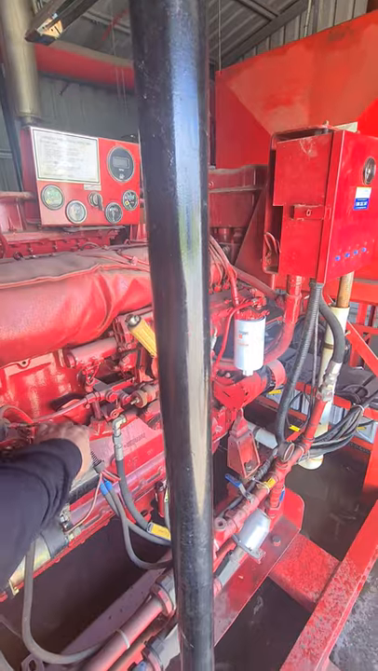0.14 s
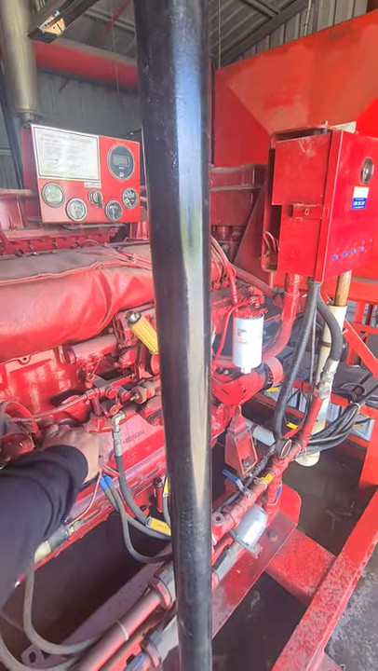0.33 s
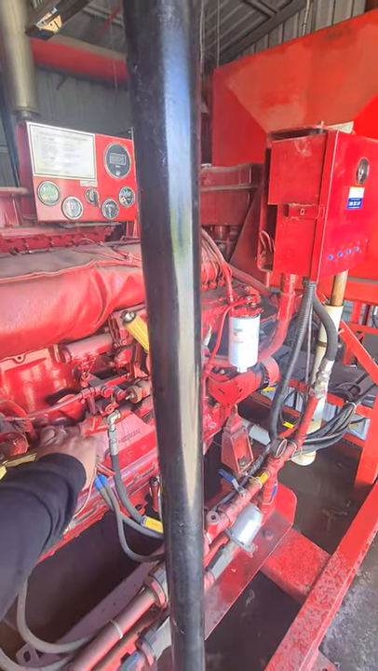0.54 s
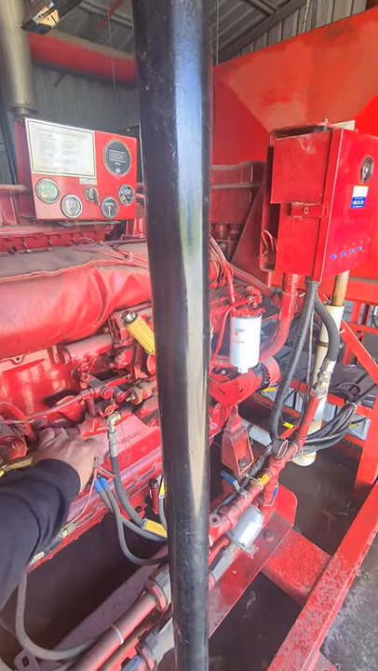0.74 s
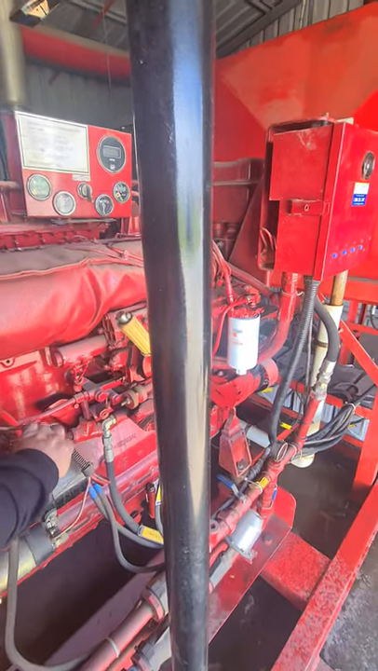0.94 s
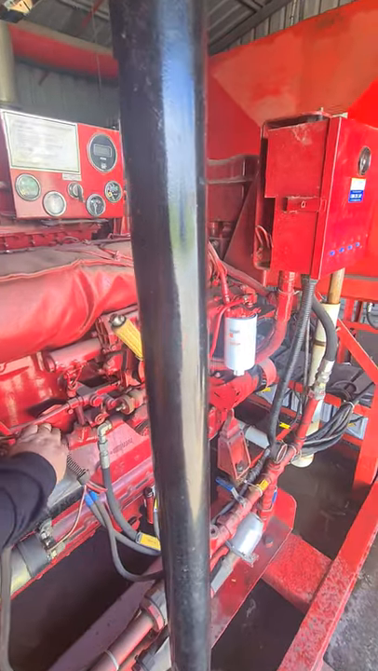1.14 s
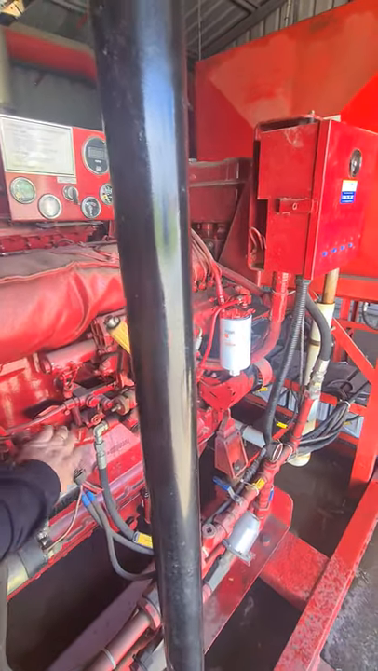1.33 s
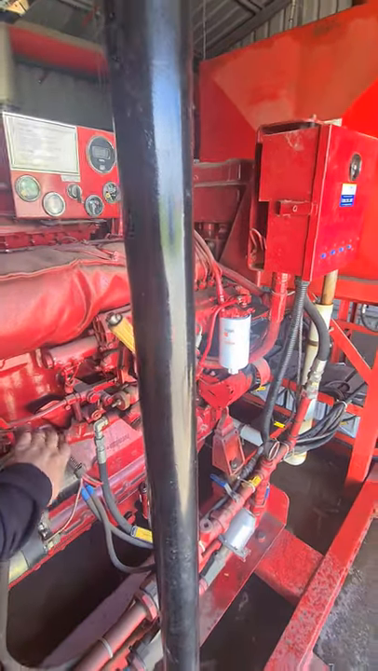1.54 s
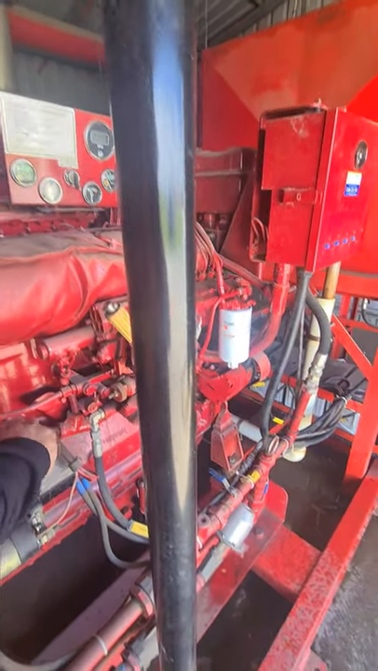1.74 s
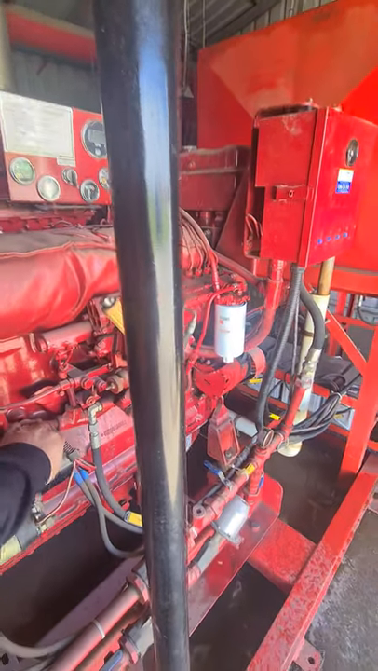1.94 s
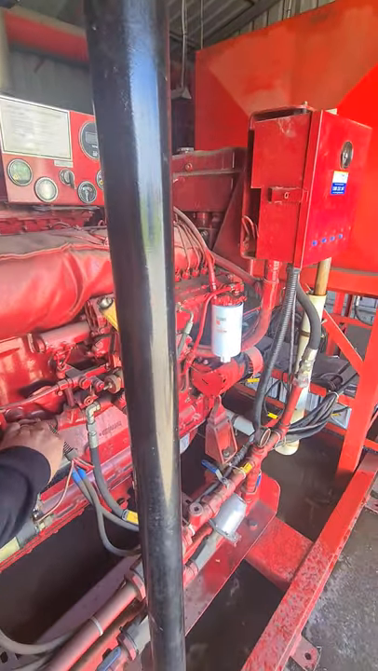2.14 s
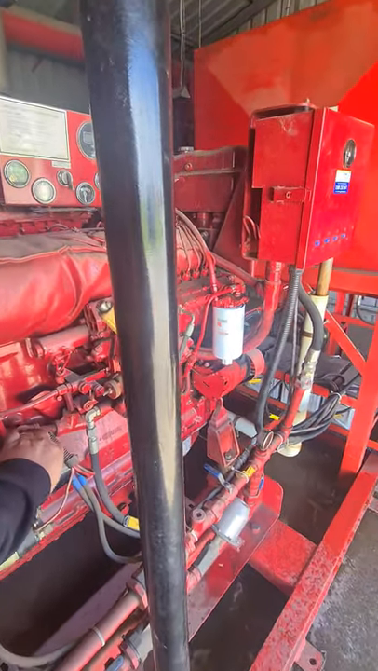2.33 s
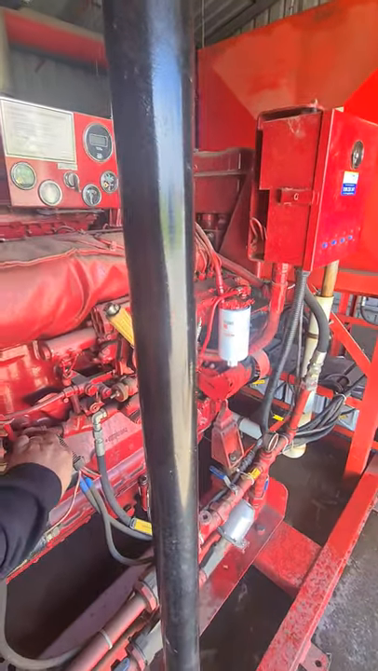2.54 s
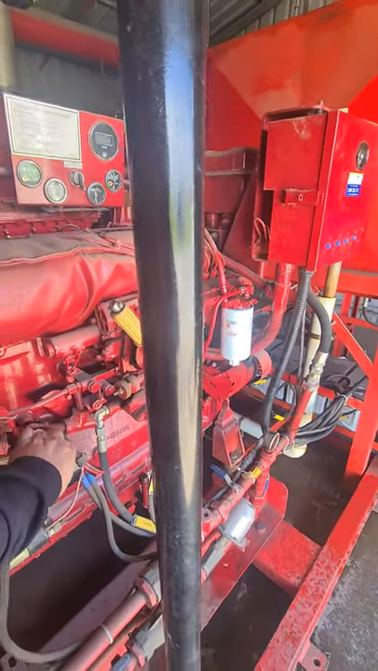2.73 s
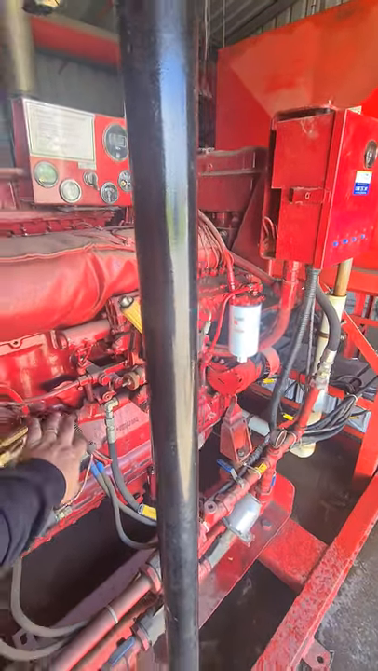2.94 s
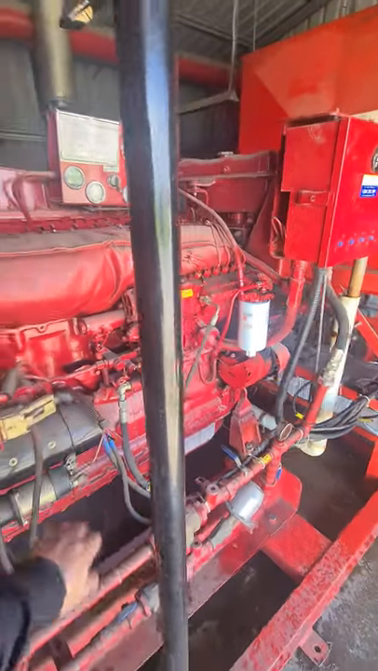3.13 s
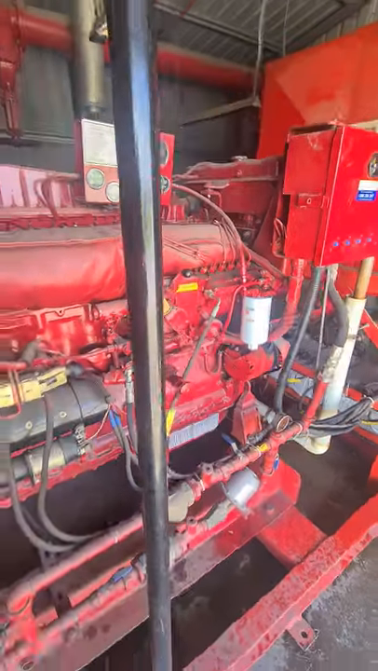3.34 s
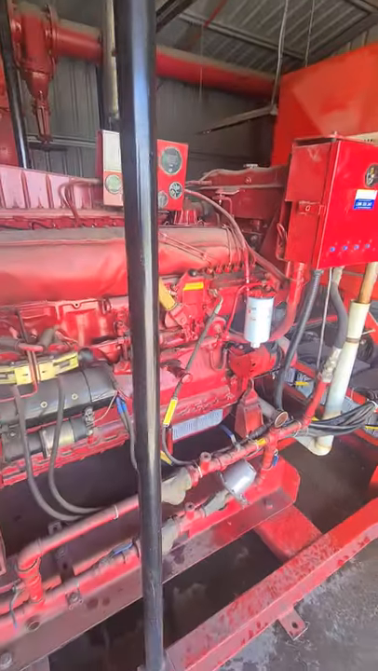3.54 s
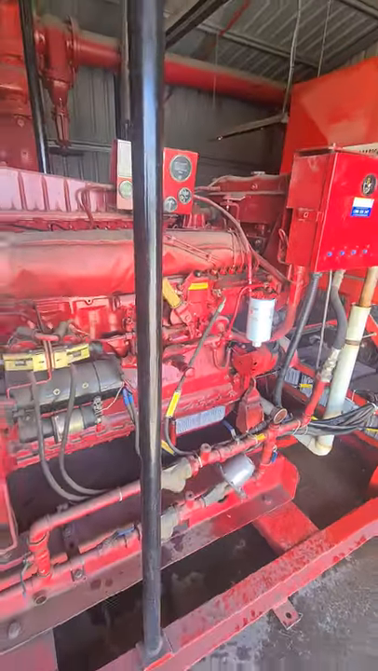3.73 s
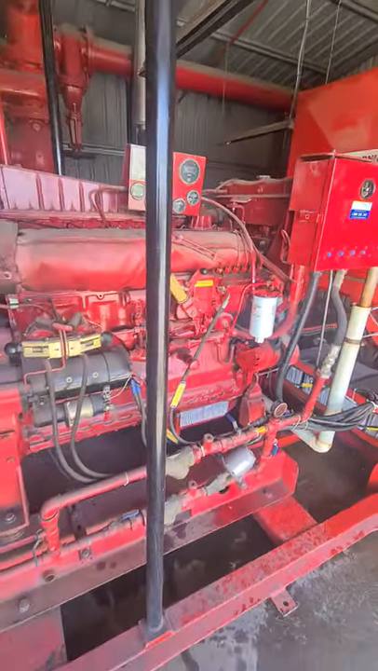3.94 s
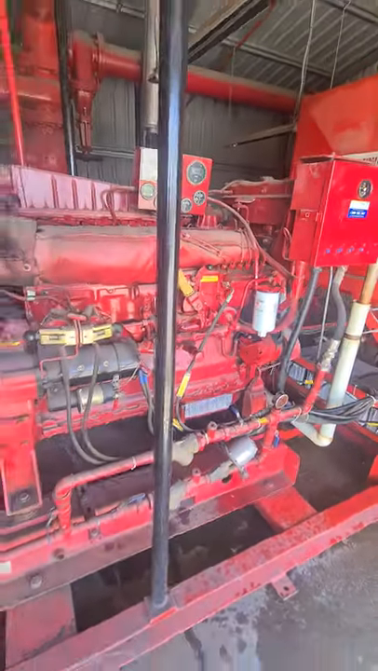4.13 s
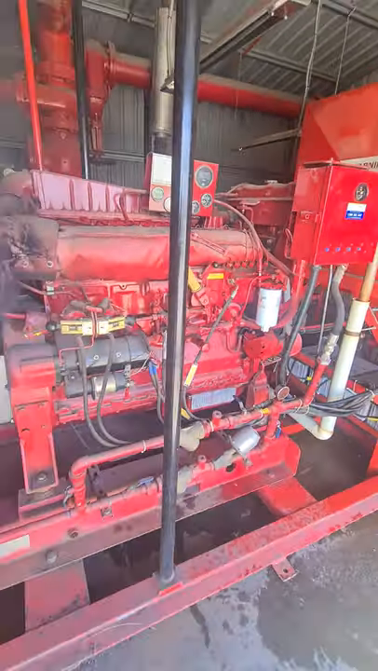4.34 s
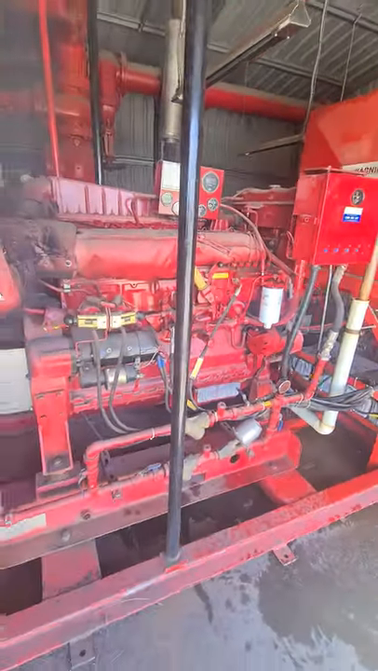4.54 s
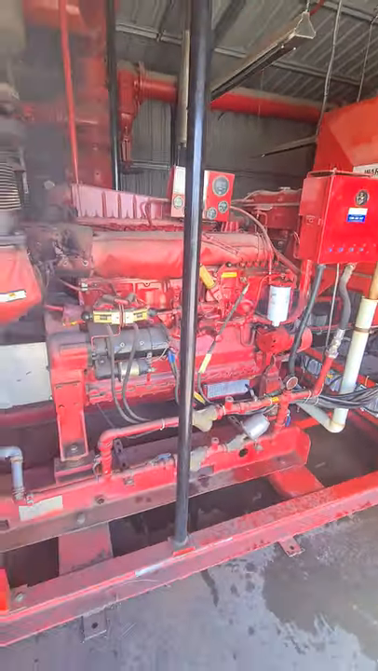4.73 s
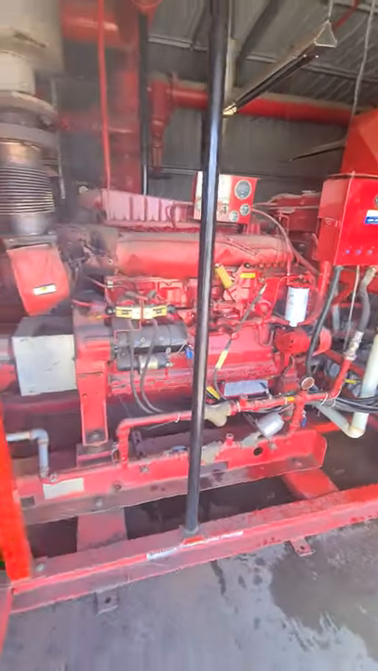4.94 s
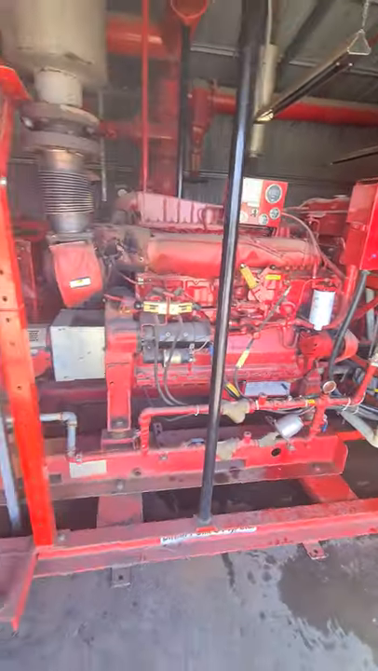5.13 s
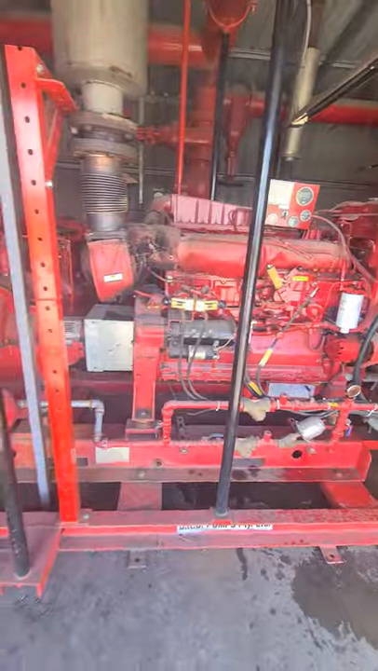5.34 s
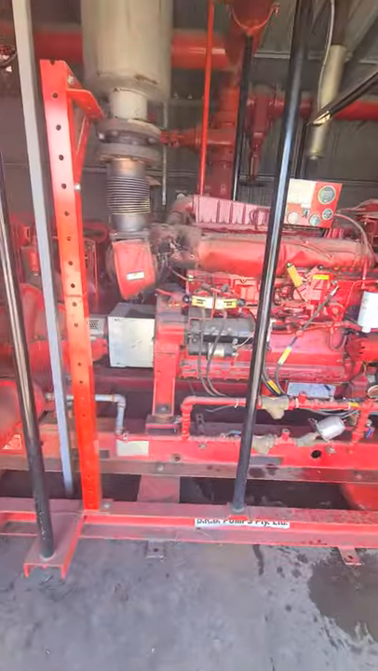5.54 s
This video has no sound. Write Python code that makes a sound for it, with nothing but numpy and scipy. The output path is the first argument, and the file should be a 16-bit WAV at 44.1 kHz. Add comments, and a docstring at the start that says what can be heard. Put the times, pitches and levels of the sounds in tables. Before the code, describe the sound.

A faint, throbbing machine hum fills a sheet-metal pump house. Small lever clicks come close by at about 0.3 seconds. At 1 second a starter contact snaps and the gear slams in with a heavy clank that rings the steel frame. Gears knock briefly, a lighter clunk follows at 1.3 seconds, and the engine rocks back to rest. Just after 2.1 seconds a sharper snap and a second slam start it cranking, with rasping teeth and a low boom. The big diesel catches at about 2.6 seconds and races up, its separate knocks and thuds merging under injector hiss and rising exhaust tones. One more sharp click sounds at 3 seconds, as the listener steps back and the hiss begins to dull. A thin, high belt squeal grows, then shoots up and vanishes around 4.3 seconds. The engine then runs loud and steady until 5.5 seconds.

```python
"""A sheet-metal pump house, where a big six-cylinder diesel is started by hand.
The starter contact snaps, the pinion slams in and rings the frame, and the engine rocks back to rest.
At the second try it cranks with knocking gear teeth, fires and runs up to governed speed: each firing
strikes the block, injectors hiss, exhaust tones sweep through the pipe and the belt squeals briefly.
The listener steps back, which dulls the hiss. Another machine hums far off."""
import sys
import numpy as np
from scipy import signal
from scipy.fft import rfft, irfft, next_fast_len
from scipy.io import wavfile
from scipy.ndimage import uniform_filter1d

SR = 44100
rng = np.random.default_rng(int(sys.argv[2]) if len(sys.argv) > 2 else 0)


def log_audio(samples):
    """Write samples as a 16-bit WAV file to the path given in sys.argv[1]."""
    # one column per channel
    frames = np.atleast_2d(samples).T
    # limit to full scale, then quantise
    limited = np.clip(frames, -1, 1)
    pcm = np.round(limited * 32767).astype(np.int16)
    wavfile.write(sys.argv[1], SR, pcm)


N = 250929
TIME = np.arange(N) / SR
CYLINDERS = 6


def from_db(db):
    return 10 ** (np.asarray(db) / 20)


def unit_rms(x):
    return x / np.sqrt(np.mean(x ** 2) + 1e-20)


def at_hz(table, hz):
    """A table read on a log-frequency axis."""
    table_hz, values = np.transpose(table)
    return np.interp(np.log(hz), np.log(table_hz), values)


def ramp(start_s, length_s):
    return np.clip((TIME - start_s) / length_s, 0, 1)


def envelope(start_s, attack_s, hold_s, fall_db_per_s):
    falling_s = np.maximum(TIME - start_s - attack_s - hold_s, 0)
    return ramp(start_s, attack_s) * from_db(-fall_db_per_s * falling_s)


def drift(rate_hz):
    """Random wander, rms 1."""
    knots = rng.standard_normal(int(N / SR * rate_hz) + 2)
    return unit_rms(np.interp(TIME * rate_hz, np.arange(len(knots)), knots))


def resonate(x, hz, width_hz):
    """Two-pole resonance, rms 1."""
    r = np.exp(-np.pi * width_hz / SR)
    poles = [1, -2 * r * np.cos(2 * np.pi * hz / SR), r * r]
    return unit_rms(signal.lfilter([1, 0, -1], poles, x + 1e-18))


def add(out, start_s, sound):
    i = round(start_s * SR)
    out[:, i:i + sound.shape[-1]] += sound[..., :N - i]


def steady(x):
    """Evens out slow level changes, leaving the single beats."""
    power = uniform_filter1d(np.mean(x ** 2, axis=0), size=8000)
    return x / np.sqrt(np.abs(power) + np.mean(x ** 2) / 20)


def pulses(strokes, rate_hz, decay_s, floor, uneven_db):
    """A rounded swell of uneven strength at each whole stroke count."""
    force = from_db(uneven_db * rng.uniform(-1, 1, 2000))[strokes.astype(int)]
    since_s = strokes % 1 / rate_hz
    return steady(uniform_filter1d(floor + force * np.exp(-since_s / decay_s), size=70)[None])


def struck(modes, rise_s):
    """One second of decaying modes, phased differently on each side."""
    t, out = TIME[:SR], 0
    for hz, db, t60 in modes:
        phase = rng.random() + min(hz / 3000, 1) * rng.random((2, 1))
        out = out + from_db(db - 60 * t / t60) * np.sin(2 * np.pi * (hz * t + phase))
    return out * (1 - np.exp(-t / rise_s))


# room width: (frequency [Hz], side re mid [dB])
ROOM_WIDTH = [(60, -27), (125, -11), (250, -20.5), (550, -2), (1100, 0), (15000, 0)]
# room balance: (frequency [Hz], left re right [dB])
ROOM_BALANCE = [(100, -1), (350, -4), (700, -1), (2400, -.5), (5000, 2.5), (7500, 7), (11000, -1.5)]


def room_noise(spectrum, count=N, tilt_db_per_oct=0, ripple_db=3.5):
    """Noise with a fine random ripple in its upper spectrum, giving a faintly ringing colour; rms 1."""
    size = next_fast_len(count, True)
    hz = np.maximum(np.fft.rfftfreq(size, 1 / SR), 1)
    mid, side = rfft(rng.standard_normal((2, size)))
    ripple = np.interp(hz, np.linspace(0, SR / 2, 400), rng.standard_normal(400))
    ripple *= np.minimum(hz / 1500, 1)
    width, sides = from_db(at_hz(ROOM_WIDTH, hz)), np.array([[1], [-1]])
    stereo = (mid + sides * width * side) / np.hypot(1, width)  # centred bass, diffuse above
    colour_db = at_hz(spectrum, hz) + ripple_db * ripple + tilt_db_per_oct * np.log2(hz)
    pan_db = sides * at_hz(ROOM_BALANCE, hz) / 2
    rolloff = np.minimum(spectrum[-1][0] / hz, 1) ** 4
    return unit_rms(irfft(from_db(colour_db + pan_db) * rolloff * stereo, size)[:, :count])


# room decay: (frequency [Hz], t60 [s])
ROOM_DECAY = [(100, 0.5), (500, 1.272), (2000, 1.0026), (6000, 0.6604), (13000, 0.0004)]


def blow(spectrum, t60_s, room_db, bloom_s, tilt_db_per_oct=0, count=32768):
    """A blow on metal: a noisy ring dies away, the room rings on, the lows build up last."""
    t, out = TIME[:count], 0
    noise_bins = rfft(room_noise(spectrum, count, tilt_db_per_oct))
    octave = np.log2(np.clip(np.fft.rfftfreq(count, 1 / SR), 128, 16384))
    for k in range(7, 15):
        band = irfft(noise_bins * np.maximum(1 - abs(octave - k), 0))
        rise = 1 - np.exp(-t / (bloom_s * (1000 / 2 ** k) ** 1.1502))
        metal = from_db(-60 * t / t60_s)
        room = from_db(room_db - 60 * t / at_hz(ROOM_DECAY, 2 ** k))
        out = out + band * rise * np.hypot(metal, room)
    return out


# room air spectrum: (frequency [Hz], density [dB])
AIR_SPECTRUM = [(20, -36.5), (48, -12.5), (72, -3), (123, -20.5), (215, -25), (270, -20), (310, -27.5),
                (900, -31), (3200, -42.5), (7000, -50), (9500, -61.5), (16000, -67)]


def background():
    """Air in the pump house and the throbbing hum of a distant machine."""
    hum = resonate(rng.standard_normal(N), hz=74.55, width_hz=11.5)
    hum = resonate(hum, hz=90.1, width_hz=22.14)
    return from_db(-35.5) * room_noise(AIR_SPECTRUM) + from_db(-50) * hum


# gas puffs: (time [s], attack [s], hold [s], level [dB])
GAS_PUFFS = [(1.03, 0.2931, 0.028, -25), (2.449, 0.1841, 0.3572, -21.5)]


def silencer():
    """Gas booms through the silencer while the pistons move slowly."""
    level = sum(from_db(db) * envelope(s, attack_s, hold_s, fall_db_per_s=23)
                for s, attack_s, hold_s, db in GAS_PUFFS)
    return level * room_noise([(22, -22.5), (45, -10), (80, -9), (140, -8.5)])


# pinion in or out: (time [s], slam [dB], tooth crack [dB], frame ring [dB])
PINION_SLAMS = [(1.008, -5, -8, -8.5), (1.276, -16.5, -14.5, -15.5), (2.166, -6.5, -5.5, -4)]
# slam spectrum: (frequency [Hz], density [dB])
SLAM_SPECTRUM = [(41, -39), (70, -11.5), (118, 1), (208, -3), (280, -3.5), (606, -8.5), (744, -10.5),
                 (1610, -16.5), (1850, -22), (3190, -20), (3910, -33.5), (6450, -26), (16000, -33.5)]
# frame modes: (frequency [Hz], level [dB], t60 [s])
FRAME_MODES = [(112.24, -9, 0.7203), (137.93, -14, 0.702), (269.97, -8, 0.8267), (372.26, -27, 0.327),
               (756.07, -14.5, 1), (1989.8, -20.5, 0.2748)]


def pinion():
    """The heavy pinion slams into the ring gear or drops out, ringing the frame."""
    out = np.zeros((2, N))
    for s, slam_db, _, frame_db in PINION_SLAMS:
        add(out, s, from_db(slam_db) * blow(SLAM_SPECTRUM, t60_s=0.1545, room_db=-2.5, bloom_s=0.005399))
        add(out, s + 0.012, from_db(frame_db) * struck(FRAME_MODES, rise_s=0.00766))
    return out


# lever and contact snaps, with one ring gear knock at first compression: (time [s], level [dB], t60 [s], tilt
# [dB/octave])
CONTACT_SNAPS = [(0.335, -33, 0.0576, -1), (0.344, -24.5, 0.1034, -1.5), (0.364, -24, 0.05055, -2.5),
                 (0.919, -40, 1, -2), (0.987, -14.5, 0.3012, -2.5), (1.1, -5, 0.04196, 11.5),
                 (1.305, -30, 0.2984, 7), (1.471, -28.5, 0.0972, 0), (1.933, -25, 0.01318, -3),
                 (1.954, -29.5, 0.1112, -1), (2.125, -11.5, 0.03298, -1), (2.136, -2, 0.01928, -1.5),
                 (2.39, -24.5, 0.331, 0), (3.03, -11, 0.055, 4)]
# snap spectrum: (frequency [Hz], density [dB])
SNAP_SPECTRUM = [(400, -8), (1100, -11), (2600, -3.5), (4400, -8), (6400, -2.5), (8000, -14), (16000, -17)]
# steel lever modes: (frequency [Hz], level [dB], t60 [s])
LEVER_MODES = [(2154, -14.5, 0.4297), (2960, -23.5, 0.4414), (3757, -13.5, 0.392), (3995.4, -13.5, 0.1438),
               (5324.4, -17, 0.439), (6774, -6, 0.1273)]


def starter_snaps():
    """The contact snaps, the ring gear knocks at first compression, and teeth clash just before each slam; all
    ring the lever."""
    out, lever = np.zeros((2, N)), struck(LEVER_MODES, rise_s=0.00186)
    cracks = [(s - 0.0054, crack_db, 0.07263, -3) for s, _, crack_db, _ in PINION_SLAMS]
    rise = ramp(0, 0.002516)[:24000]
    for s, db, t60, tilt in CONTACT_SNAPS + cracks:
        snap = blow(SNAP_SPECTRUM, t60, room_db=-19, bloom_s=0.002512, tilt_db_per_oct=tilt, count=24000)
        add(out, s, from_db(db) * rise * snap)
        touch = min(t60 / 0.0549, 1)  # the briefest touches hardly ring
        add(out, s, from_db(min(db, -20) - 6.5) * touch * lever)
    return out


# gear train, a kick, two rocks back, the second try:
# (time [s], attack [s], hold [s], gears [dB], rasp [dB], tooth rate [Hz])
GEAR_MOVES = [(1.024, 0.062, 0.01553, -19, -27.5, 81.15), (1.26, 0.01593, 0.01509, -16, -40, 60),
              (1.442, 0.0199, 0.01522, -22, -51, 70), (2.199, 0.1886, 0.19046, -19, -30.5, 110.57)]
# gear body spectrum: (frequency [Hz], density [dB])
GEAR_SPECTRUM = [(35, -51.5), (85, 1.5), (185, -10), (280, -6), (470, -8), (950, -18), (2200, -19),
                 (3200, -33), (5200, -41)]
# tooth rasp spectrum: (frequency [Hz], density [dB])
RASP_SPECTRUM = [(2000, -9), (3500, -1.5), (4900, -8.5), (6000, 0.5), (8500, -12), (12000, -15.5),
                 (16000, -24.5)]


def cranking():
    """Teeth knock unevenly through their backlash; the ring gear sings, most at first compression."""
    gears, rasp = room_noise(GEAR_SPECTRUM), room_noise(RASP_SPECTRUM)
    ring = resonate(rng.standard_normal((2, N)), hz=2084.4, width_hz=158.2)
    ring = resonate(ring, hz=2520.3, width_hz=700)
    compression = np.exp(-((TIME - 2.37) / 0.04737) ** 2)
    body = gears + from_db(-3.5) * ring * (0.1746 + compression)
    gear_power, rasp_power = 0, 0
    for s, attack_s, hold_s, gear_db, rasp_db, tooth_hz in GEAR_MOVES:
        teeth = np.cumsum(np.abs(tooth_hz * (1 + 0.14169 * drift(15)))) / SR
        mesh = pulses(teeth, tooth_hz, decay_s=0.003553, floor=0.997, uneven_db=2)
        gear_level = from_db(gear_db) * envelope(s, attack_s, hold_s, fall_db_per_s=56)
        rasp_level = from_db(rasp_db) * envelope(s, attack_s, hold_s, fall_db_per_s=59.5)
        gear_power = gear_power + (mesh * gear_level) ** 2
        rasp_power = rasp_power + mesh * rasp_level ** 2
    return np.sqrt(gear_power) * body + np.sqrt(rasp_power) * rasp


def belt(beat, catch_s, grip_s=4.2345):
    """The slipping belt squeals, tugged by each firing; it grows, then shoots up and dies on gripping."""
    slipping_s = np.clip(TIME, catch_s, grip_s) - catch_s
    gripping_s = np.clip(TIME - grip_s, 0, 1)
    db = -35 + 7 * slipping_s - 72 * gripping_s
    hz = 7740.7 + 59.907 * drift(14) + 4800 * gripping_s
    rough = signal.sosfilt(signal.butter(2, 210, fs=SR, output="sos"), rng.standard_normal((2, 2, N)))
    phase = 2 * np.pi * np.cumsum(hz) / SR
    squeal = unit_rms(rough[0] * np.cos(phase) + rough[1] * np.sin(phase))
    return from_db(db + 1.955 * drift(24)) * beat * squeal * from_db([[1], [-4]])


def cylinder_blows(firings, spectrum, t60_s, room_db, uneven_db, jitter_s):
    """Each cylinder strikes the block with its own ring, varying in force and timing."""
    onsets = np.flatnonzero(np.diff(np.ceil(firings)) > 0)
    timing, strength = rng.uniform(-1, 1, (len(onsets), 2)).T
    onsets = np.clip(onsets + np.round(timing * jitter_s * SR).astype(int), 0, N - 1)
    force, out = from_db(uneven_db * strength), 0
    for k in range(CYLINDERS):
        clicks = np.zeros((1, N))
        clicks[0, onsets[k::CYLINDERS]] = force[k::CYLINDERS]
        ring = blow(spectrum, t60_s, room_db, bloom_s=0.002236, count=10000)
        out = out + signal.fftconvolve(clicks, ring, axes=1)[:, :N]
    return steady(out)


# injector spectrum: (frequency [Hz], density [dB])
INJECTOR_SPECTRUM = [(1650, -41), (2800, 0.5), (3590, -5.5), (4500, -0.5), (5200, -3.5), (7660, -3),
                     (8730, -9), (10400, -12.5), (11900, -9.5), (15100, -17.5), (16000, -21)]


def injectors(firings, beat, step_back_s=2.9073):
    """Injectors tick and hiss, losing level and treble as the listener steps back."""
    ticks = cylinder_blows(firings, INJECTOR_SPECTRUM,
                           t60_s=0.025, room_db=-9.5, uneven_db=4.5, jitter_s=0.0002)
    hiss = beat * room_noise(INJECTOR_SPECTRUM) * from_db(0.7157 * drift(400))
    near = from_db(-5) * ticks + hiss
    dulling = 0.2944 * ramp(step_back_s, 2.191)
    loss_db = 2.5 * ramp(step_back_s, 0.4907)
    return from_db(-loss_db) * (near + dulling * (uniform_filter1d(near, size=3) - near))


# exhaust pipe resonances: (frequency [Hz], level [dB])
PIPE_RESPONSE = [(44, -32), (54, -27), (70, -26.5), (81, -31), (108, -21.5), (135, -27.5), (165, -22),
                 (217, -20.5)]
# main exhaust tones: (order [1/cycle], level re pipe [dB])
EXHAUST_ORDERS = [(6, -1), (9, -1.5), (12, 1.505)]
# tones of uneven cylinders: (order [1/cycle], relative level [dB])
UNEVEN_ORDERS = [(7, -21.5), (8, -15.5), (11, -10.5), (13, -12.5), (14, -5), (21, -6), (31, -18), (33, -15),
                 (40, -9.5), (41, -11)]
# timing gear whine: (order [1/cycle], relative level [dB])
WHINE_ORDERS = [(59, -22), (68, -23.5), (84, -23), (92, -22), (98, -21.5)]


def exhaust_and_whine(firings, firing_hz, fuel):
    """Engine orders sweep through the pipe and flutter on full fuel; weak ones emerge once governed."""
    cycles, cycle_hz = firings / CYLINDERS, firing_hz / CYLINDERS
    strong = [(order, db + at_hz(PIPE_RESPONSE, order * cycle_hz) - 0.7485 * fuel)
              for order, db in EXHAUST_ORDERS]
    weak = [(order, db - 21 - 14 * fuel) for order, db in UNEVEN_ORDERS + WHINE_ORDERS]
    out = 0
    for order, db in strong + weak:
        # orders near the loudest almost line up once per cycle, so the exhaust throbs
        scatter = 0.3664 if abs(order - 2 * CYLINDERS) <= 2 else 1
        phase = scatter * rng.random() + order * np.array([[0.003], [-0.003]])
        level = from_db(db + 0.7463 * drift(7) + 2 * fuel * drift(30))
        out = out + np.sqrt(2) * level * np.sin(2 * np.pi * (order * cycles + phase))
    return out * ramp(2.751, 0.187) * from_db([[-0.7], [0.6]])


# block thud spectrum: (frequency [Hz], density [dB])
THUD_SPECTRUM = [(45, -24), (80, -21), (108, 2.5), (160, 0.5), (270, -2.5), (340, -14), (500, -16.5)]


def block_thud(firings):
    """Each firing shakes the block on its frame."""
    return cylinder_blows(firings, THUD_SPECTRUM,
                          t60_s=0.1279, room_db=-3.5, uneven_db=3.5, jitter_s=0.0009052)


# combustion knock spectrum: (frequency [Hz], density [dB])
KNOCK_SPECTRUM = [(160, -29), (280, -7), (400, -4), (520, -7), (750, -4.5), (950, -7), (1400, -7),
                  (2100, -10.5), (3200, -23.5), (5000, -40)]


def combustion_knock(firings, beat):
    """Combustion hits the block sharply, over a pulsing rattle."""
    knock = cylinder_blows(firings, KNOCK_SPECTRUM,
                           t60_s=0.02465, room_db=-10, uneven_db=3.5, jitter_s=0.00007)
    rattle = beat * room_noise(KNOCK_SPECTRUM, ripple_db=5)
    return from_db(-0.3021) * knock + from_db(-5) * rattle


# run-up, with slight overshoot, to governed speed: (time [s], firing rate [Hz])
RUN_UP = [(2.555, 20.3), (2.7, 30), (3.0, 45.03), (3.1, 53.04), (3.59, 80.36), (4.31, 107.5), (4.54, 109.1),
          (5.02, 108.5), (5.5, 108.3)]


def engine(governor_s=4.0463):
    """The diesel catches weakly, then races on full fuel until the governor pulls it back."""
    firing_hz = np.interp(TIME, *np.transpose(RUN_UP))
    catch_s = RUN_UP[0][0]
    firings = np.cumsum(firing_hz * (TIME > catch_s)) / SR
    fuel = 1 - ramp(governor_s, 0.7177)  # 1 racing, 0 governed
    catch_db = -11.5 * np.exp(-np.maximum(TIME - catch_s, 0) / 0.10046)
    # strokes stand out while slow and merge at speed
    beat = pulses(firings, firing_hz, decay_s=0.05684, floor=0.834, uneven_db=2) * ramp(catch_s, 0.00311)
    knock = from_db(-19 + catch_db + 2.5 * fuel) * combustion_knock(firings, beat)
    thud = from_db(-26 + 0.776 * catch_db + 9 * fuel) * block_thud(firings)
    hiss = from_db(-20.5 + catch_db) * injectors(firings, beat)
    return knock + thud + hiss + exhaust_and_whine(firings, firing_hz, fuel) + belt(beat, catch_s)


def scene():
    """Two tries of the starter, then the running engine."""
    return background() + starter_snaps() + pinion() + cranking() + silencer() + engine()


def record(dry):
    """Soft clip, then a 16 kHz low-pass."""
    rounded = dry / (1 + dry ** 6) ** (1 / 6)
    return signal.sosfilt(signal.ellip(10, 0.1, 80, 16000, fs=SR, output="sos"), rounded)


dry = scene()
out = record(dry)
log_audio(out)
```